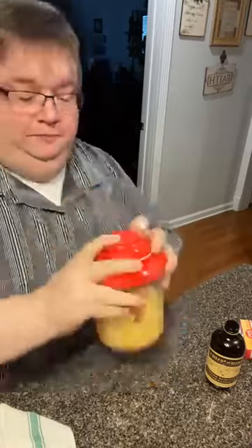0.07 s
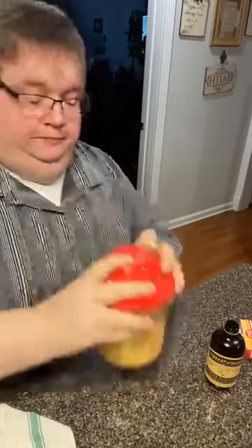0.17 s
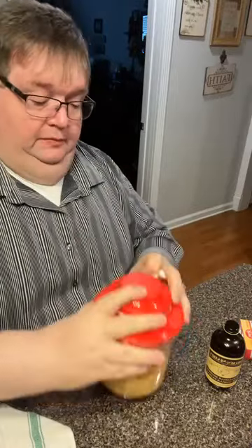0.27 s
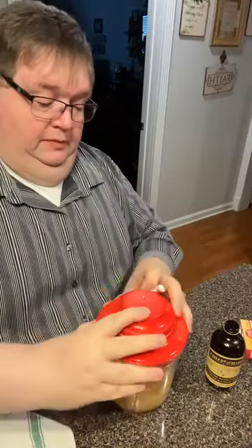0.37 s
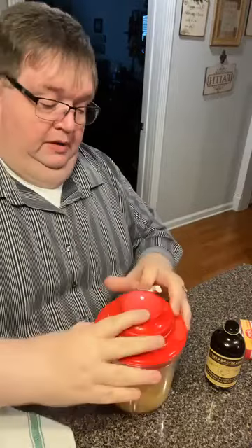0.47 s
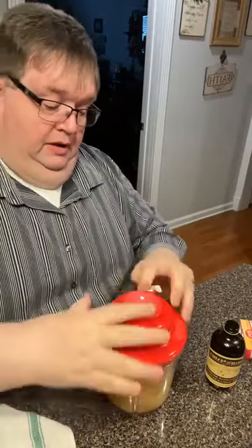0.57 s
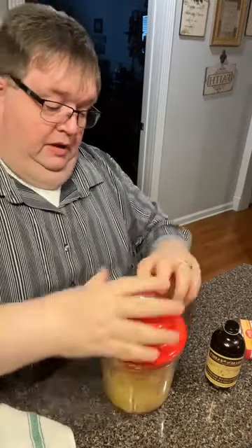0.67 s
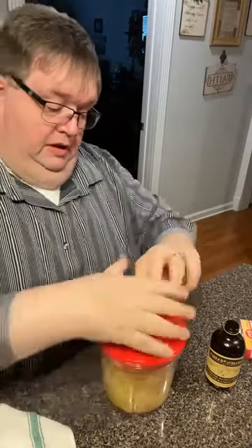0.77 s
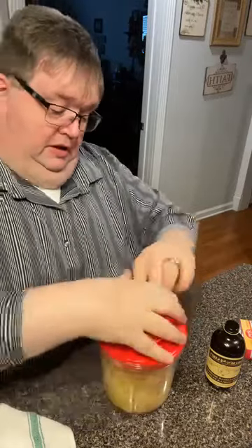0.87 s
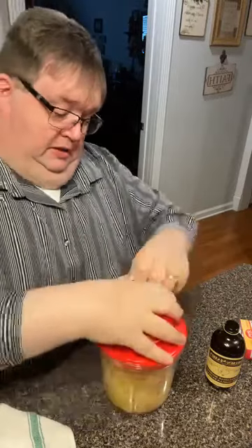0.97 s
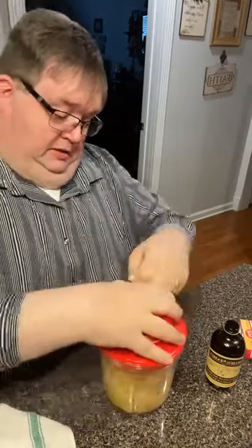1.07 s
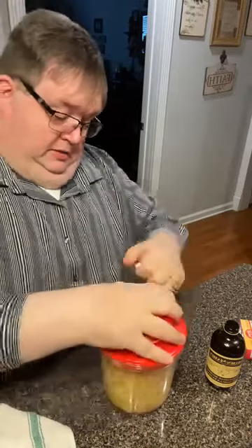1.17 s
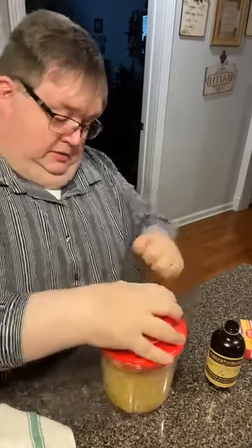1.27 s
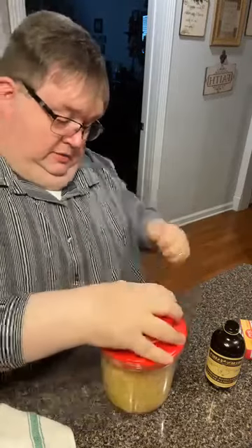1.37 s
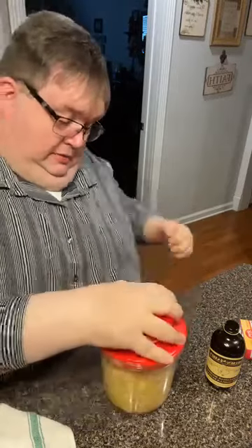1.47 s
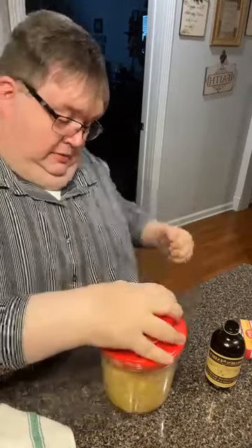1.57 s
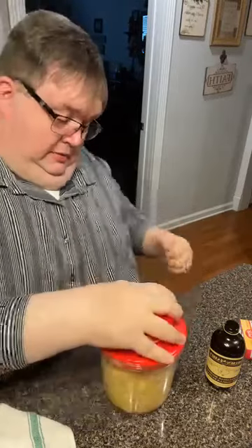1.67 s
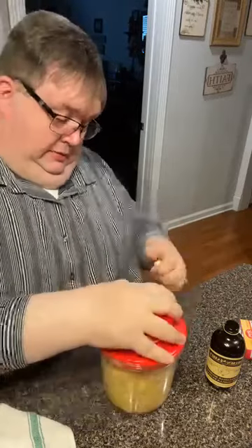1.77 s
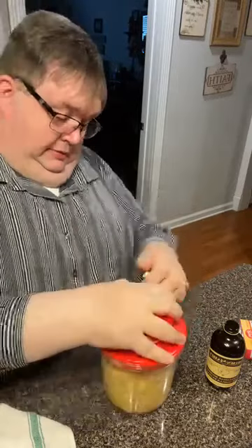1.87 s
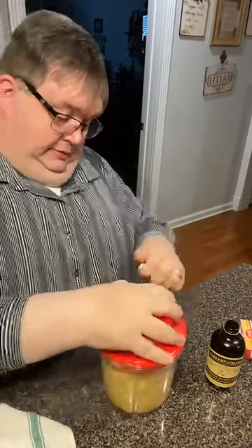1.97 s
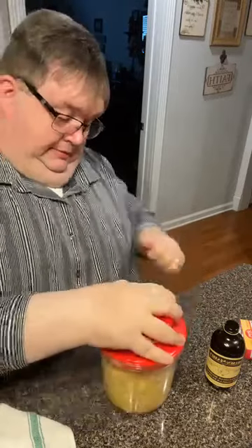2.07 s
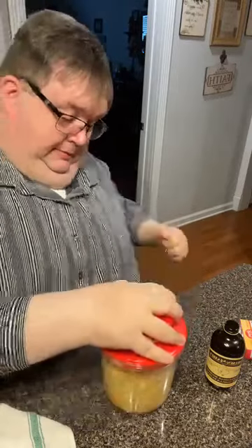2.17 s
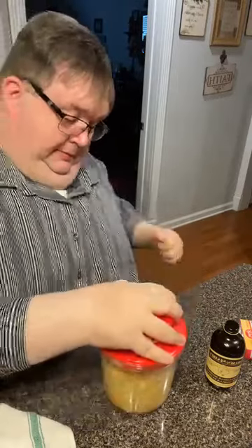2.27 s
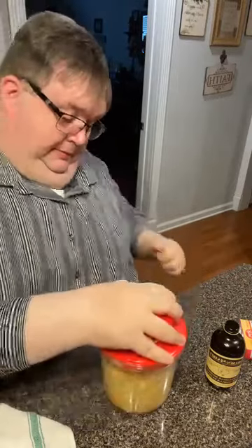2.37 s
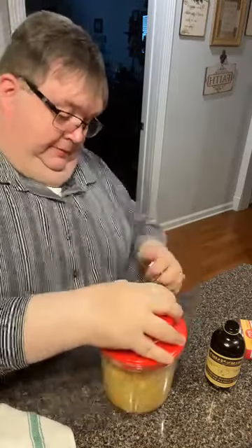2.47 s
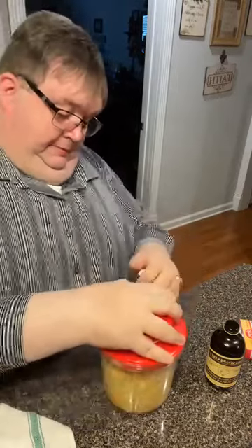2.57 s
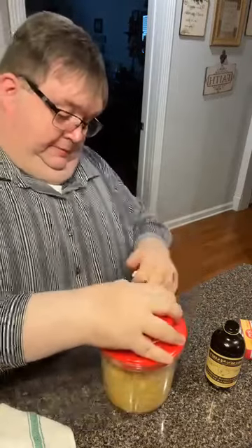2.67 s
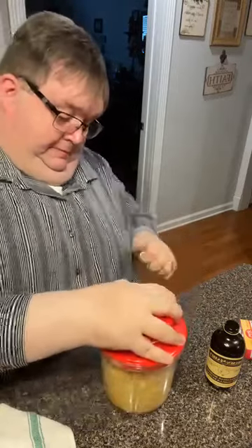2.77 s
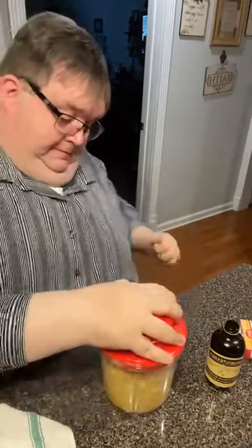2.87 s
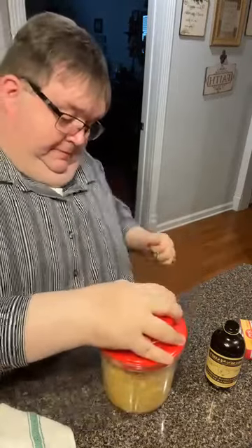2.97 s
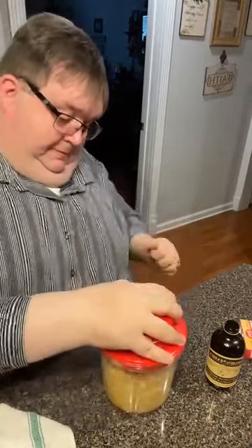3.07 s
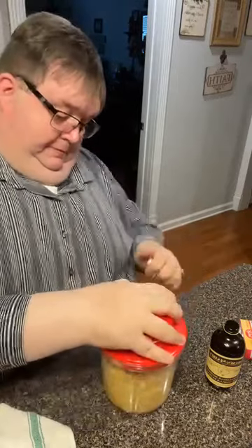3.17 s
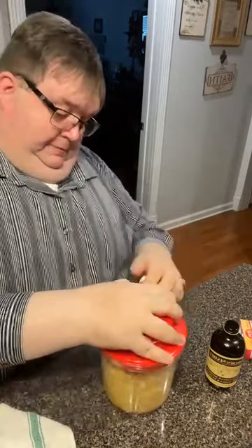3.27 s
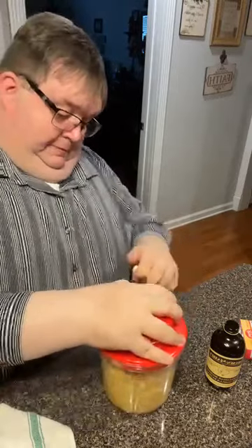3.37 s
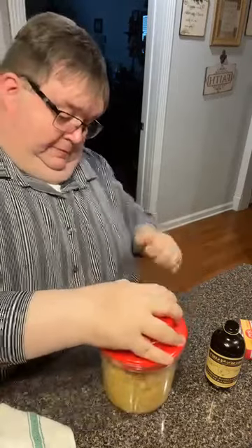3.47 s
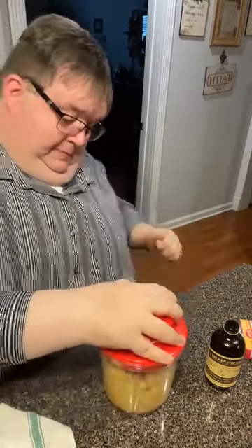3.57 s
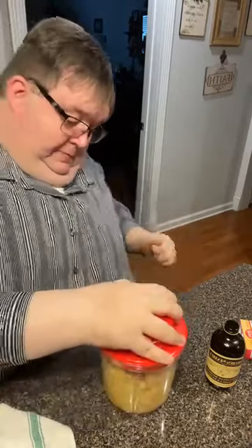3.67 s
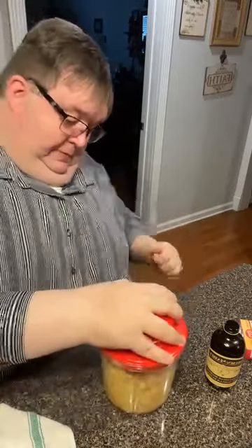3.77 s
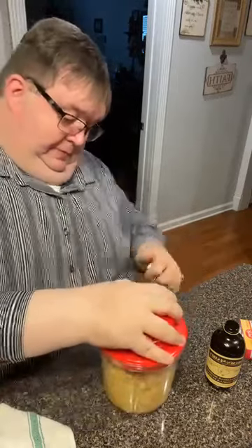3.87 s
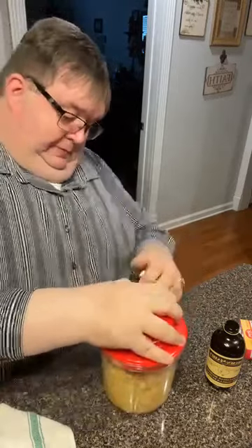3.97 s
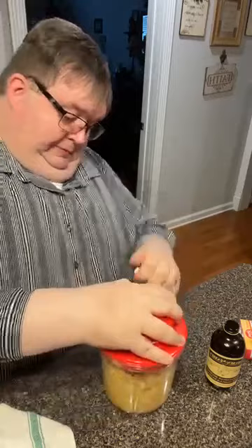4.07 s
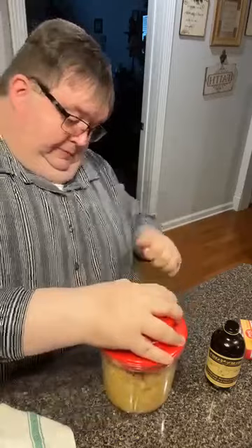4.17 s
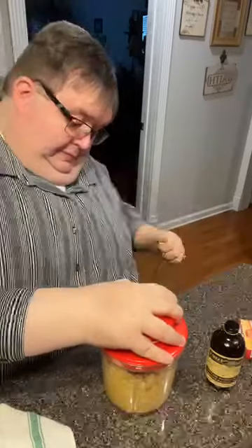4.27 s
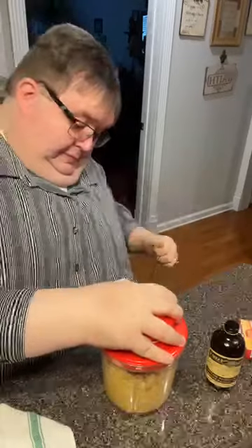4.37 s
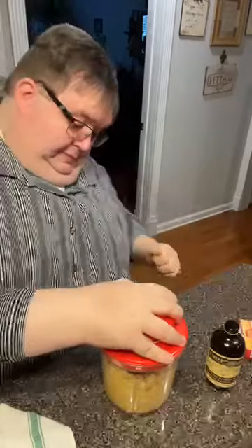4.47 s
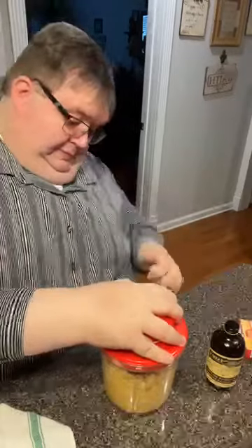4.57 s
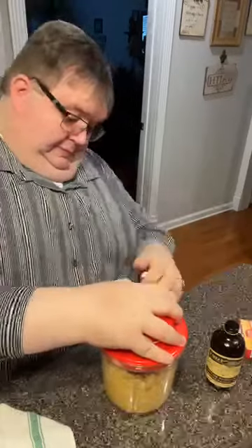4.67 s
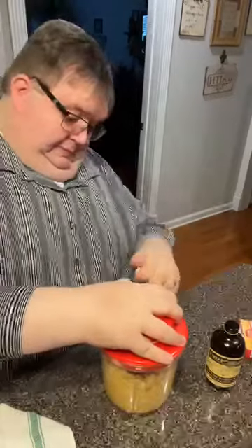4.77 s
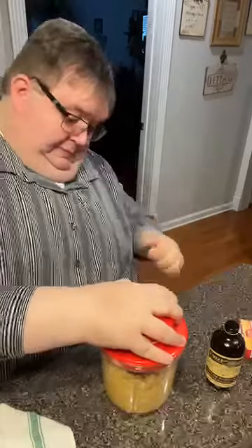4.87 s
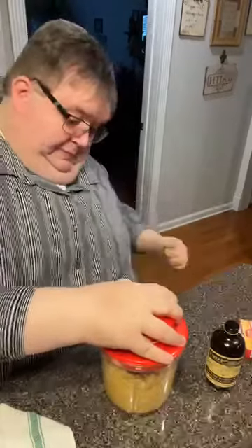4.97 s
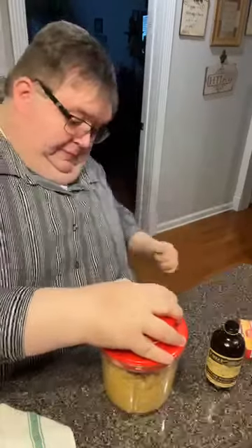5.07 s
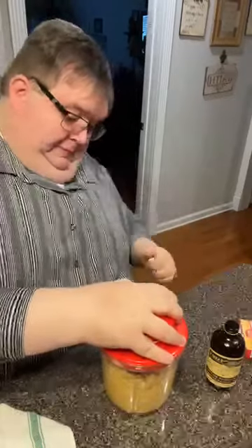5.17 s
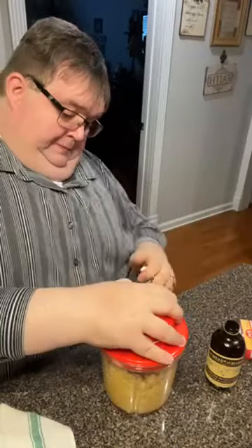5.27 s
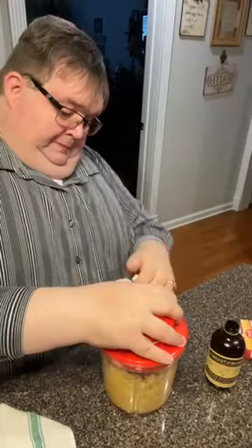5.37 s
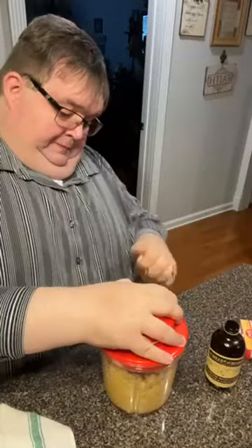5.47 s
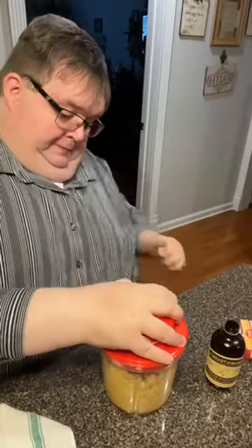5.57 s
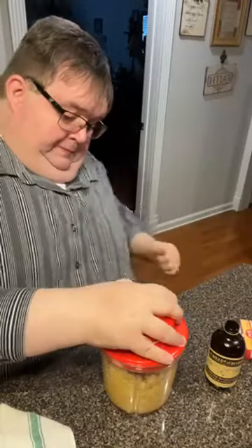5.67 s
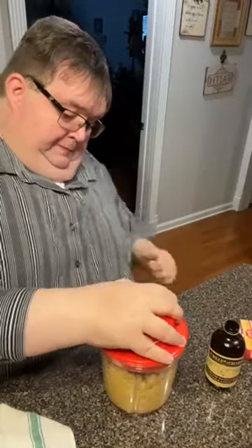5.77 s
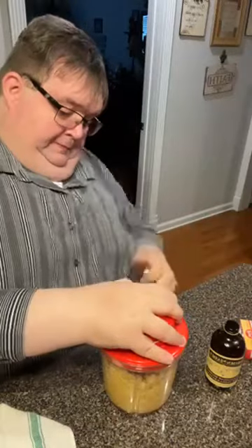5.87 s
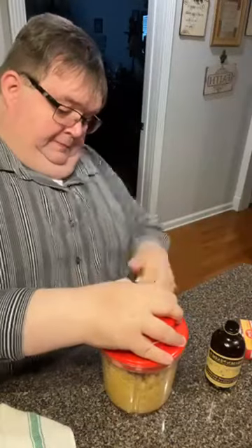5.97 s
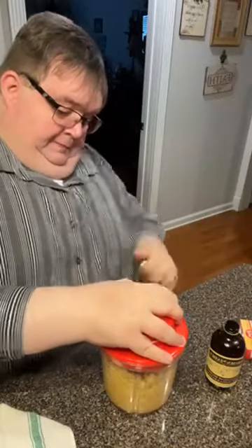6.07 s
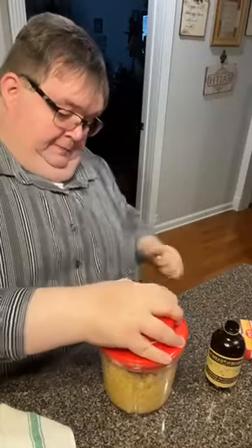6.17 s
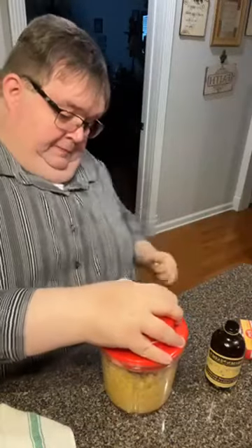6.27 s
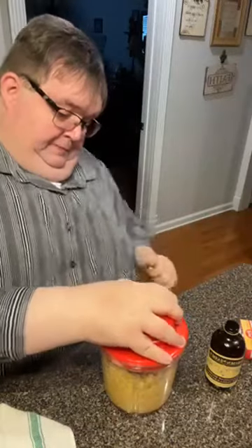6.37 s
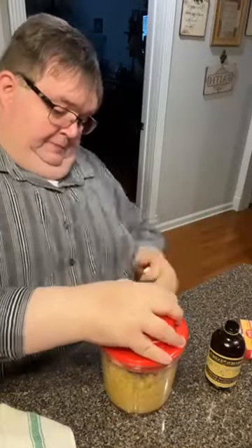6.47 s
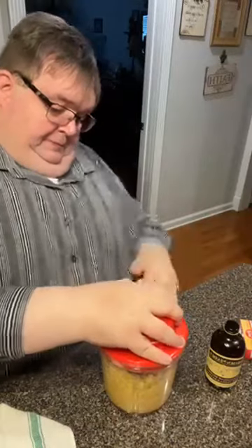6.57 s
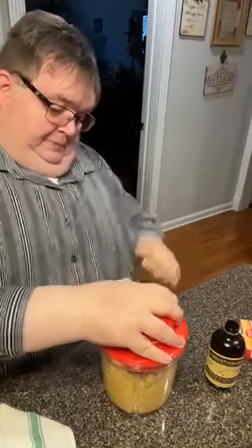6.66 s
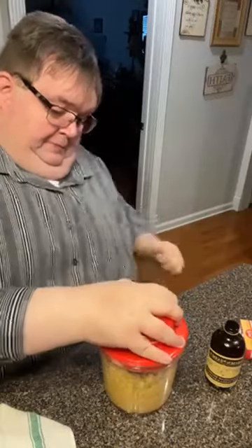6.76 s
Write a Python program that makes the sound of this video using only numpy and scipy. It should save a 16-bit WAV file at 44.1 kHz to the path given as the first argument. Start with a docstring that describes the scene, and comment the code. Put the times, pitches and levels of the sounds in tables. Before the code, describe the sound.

Repeated pulls on a hand food chopper, each a plastic clack and short chopping whirr followed by a rasping rewind, after a thud.

```python
"""A pull-cord food chopper is worked nine times: its blades fling apple bits against the plastic jar,
which shakes under the uneven load. The clutch clacks as a pull begins; between pulls a spring winds
the rasping cord back and the freewheel rattles in the hollow lid. Before the first pull, fingers rub
and tap the jar and set it down on a stone counter with a ringing thud.
Around it is a kitchen with a short reverb, faint air and a deep rumble."""
import sys
import numpy as np
from scipy import signal
from scipy.fft import rfft, irfft
from scipy.io import wavfile
from scipy.ndimage import uniform_filter1d

SR = 44100
rng = np.random.default_rng(int(sys.argv[2]) if len(sys.argv) > 2 else 0)


def transcribe(signal):
    """Save signal, clipped to [-1, 1], as a 16-bit WAV file at the path in sys.argv[1]."""
    frames = np.atleast_2d(signal).T
    limited = np.clip(frames, -1, 1)
    pcm = np.round(limited * 32767).astype(np.int16)
    wavfile.write(sys.argv[1], SR, pcm)


N = 301644
TIME = np.arange(N) / SR
BINS = np.fft.rfftfreq(8192, 1 / SR)

# pulls of the cord: t/s, length/s, churn level/dB, shake level/dB, clutch level/dB, hollow ring/dB
PULLS = [(1.293, 0.34, -32.5, -29.5, -39, 5), (2.091, .23, -28, -26.5, -6.5, 4),
         (2.7884, 0.23, -28.5, -25, -5, -0.5), (3.4897, 0.23, -28, -26, -2.5, -10),
         (4.2012, 0.23, -28, -26, -0.5, -8.5), (4.8963, 0.22, -27, -27.5, -2, 0),
         (5.5512, 0.2, -26.5, -26, -4.5, -1), (6.1624, 0.17, -27.5, -33.5, -1.5, 0),
         (6.7526, 0.21, -26, -29, -4.5, -1.5)]
# spectrum of a pawl hitting a ratchet tooth: f/Hz, level/dB
PAWL_SPECTRUM = [(60, -31), (260, -7), (700, -8.5), (1200, -4), (1750, -7), (2300, -4.5), (3100, 0),
                 (3850, -2), (4400, -20), (5500, -19), (9500, -27), (11500, -44), (16000, -41)]
# spectrum of the shaking jar: f/Hz, level/dB
SHAKE_SPECTRUM = [(30, -4), (55, -2), (70, -8), (84, 0.5), (108, 2), (125, -16), (200, -28.5), (500, -53)]


def amp(db):
    """Decibels to gain."""
    return 10 ** (np.asarray(db) / 20)


def unit(x):
    """Scales to rms 1."""
    return x / np.sqrt(np.mean(x ** 2) + 1e-20)


def curve(points, hz=BINS):
    """Joins breakpoints by straight lines on a log-frequency axis."""
    f, value = np.transpose(points)
    return np.interp(np.log(hz + 1), np.log(f + 1), value)


def add(mix, s, sound):
    """Mixes a sound in at time s."""
    part = mix[max(round(s * SR), 0):][:len(sound)]
    part += sound[:len(part)]


def impulse(db):
    """The minimum-phase ring, of energy 1, that has this spectrum."""
    log_gain = np.log(amp(np.concatenate([db, db[-2:0:-1]])))
    spectrum = np.exp(np.conj(signal.hilbert(log_gain)))
    ring = np.fft.ifft(spectrum).real[:len(db)]
    return ring / np.linalg.norm(ring)


def through(x, ring):
    """Plays x through a ring."""
    return signal.oaconvolve(x, ring)[:N]


def noise(spectrum):
    """Steady coloured noise, rms near 1."""
    return through(rng.standard_normal(N), impulse(curve(spectrum)))


def drift(size):
    """A random wander of rms 1, smoothed over size samples."""
    return unit(uniform_filter1d(rng.standard_normal(N), size))


def grains(per_s, spread_db):
    """Random tiny impacts, a few of them large."""
    size = amp(spread_db * np.minimum(rng.exponential(1, N), 4))
    return unit(size * rng.choice([-1, 1], N) * (rng.random(N) < per_s / SR))


def steadied(x, size=2600):
    """Evens out the flow of energy over size samples."""
    return x / np.sqrt(abs(uniform_filter1d(x ** 2, size)) + 1e-2)


def scatter(contact_s=0.00059, shell_s=0.017, shell_db=-19, size=1024):
    """A blow chatters for a millisecond, then bending waves run round the plastic shell."""
    t = TIME[:size]
    envelope = t / contact_s * np.exp(1 - t / contact_s) + amp(shell_db) * np.exp(-t / shell_s)
    spectrum = rfft(envelope * rng.standard_normal(size), 2 * size)
    return irfft(spectrum / np.sqrt(abs(spectrum)))[:size]  # partly whitened


def lid_ring(force_db, vary_db=2, bands=26, size=2048):
    """One blow on the lid, of energy 1; its colour depends on the spot that is struck."""
    # resonances of the lid and its cavity: f/Hz, width/Hz, lift/dB
    resonances = [(1620, 207, 6.5), (1994, 162, 11), (3550, 140, 4.5), (3797, 860, 5), (5630, 1900, 5.5),
                  (7350, 58, 7.5), (8550, 280, 7), (9970, 1900, 3)]
    lift = sum(db / (1 + (2 * (BINS - hz) / width) ** 2) for hz, width, db in resonances)
    knots = np.linspace(0, np.sqrt(BINS[-1]), bands)
    spot = np.interp(np.sqrt(BINS), knots, rng.standard_normal(bands))
    ring = signal.fftconvolve(impulse(force_db + lift + vary_db * spot), scatter())[:size]
    return ring / np.linalg.norm(ring)


def shower(blows, spectrum, spots=12):
    """Spreads a train of blows over many spots of the plastic."""
    spot = rng.integers(0, spots, N)
    return unit(sum(through(blows * (spot == k), lid_ring(curve(spectrum))) for k in range(spots)))


def strike(force_db, peak_db):
    """One blow on the lid with a given peak level."""
    ring = lid_ring(force_db)
    return amp(peak_db) * ring / abs(ring).max()


def snap(peak_db, ring_db, edge_db):
    """Hard plastic snaps; some ring the cavity more, some have a sharper edge."""
    # spectrum of a hard plastic hit: f/Hz, level/dB
    snap_spectrum = [(100, -15), (400, 0), (1000, -5), (1500, 5), (1850, 3.5), (2450, 5.5), (2850, 2.5),
                     (3150, 9.5), (3800, 6.5), (4300, -11.5), (5700, -13), (9000, -16), (11500, -26.5),
                     (15500, -27.5)]
    tint = curve([(2200, ring_db), (3000, 0), (4000, 0), (5500, edge_db)])
    return strike(curve(snap_spectrum) + tint, peak_db)


def background(air_db=-55.5, rumble_db=-38, heave_db=-34.5, heave_s=0.49):
    """A deep rumble that swells with each pull of the arm, and the still air of the room."""
    # spectrum of the rumble: f/Hz, level/dB
    rumble_spectrum = [(5, 0.5), (10, 5.5), (22, -6.5), (38, -5), (47, -14), (60, -14.5), (72, -24),
                       (95, -15), (130, -28), (250, -92)]
    # spectrum of the room air: f/Hz, level/dB
    air_spectrum = [(88, -53), (150, -9.5), (182, -5), (209, -8), (1040, -22), (1660, -17.5), (2450, -21.5),
                    (3550, -21.5), (16000, -53)]
    swell = np.full(N, amp(rumble_db))
    heave = np.sin(np.pi * np.arange(0, heave_s, 1 / SR) / heave_s)
    hardest_db = np.max(PULLS, axis=0)[3]
    for s, _, _, shake_db, *_ in PULLS:
        add(swell, s, amp(heave_db + shake_db - hardest_db) * heave)
    return swell * unit(noise(rumble_spectrum)) + amp(air_db) * unit(noise(air_spectrum))


def kitchen(x, tail_db, build_s=0.0035):
    """The room adds a few near reflections, then a short diffuse tail."""
    # reverb time of the kitchen: f/Hz, t60/s
    decay_times = [(150, 0.44), (530, 0.37), (1400, 0.23), (3700, 0.42), (9700, 0.42), (16000, 0.53)]
    # reflections from counter, body and walls: delay/s, level/dB
    echoes = [(.0031, -49), (.0074, -22.5), (.0132, -38), (.0178, -50), (.0245, -22)]
    hz, t, bands = signal.stft(rng.standard_normal(SR // 2), SR, nperseg=256)
    decay = amp(-60 * t / curve(decay_times, hz)[:, None])
    tail = signal.istft(bands * decay * (1 - np.exp(-t / build_s)), SR)[1]
    room = amp(tail_db) * tail / np.linalg.norm(tail)
    for s, db in echoes:
        add(room, s, amp([db]))
    return x + through(x, room)


def rubbing(ends_db=-22):
    """Fingers slide on the plastic to find their grip; each slide swells and fades."""
    # finger slides: t/s, rise/s, fade/s, level/dB
    slides = [(0, 0.0067, 0.16, -38.5), (0.091, 0.024, 0.24, -34.5), (.82, 0.21, 0.058, -47),
              (1.22, 0.091, .08, -48)]
    # spectrum of skin rubbing on plastic: f/Hz, level/dB
    skin_spectrum = [(100, -13), (600, 3.5), (1500, -2), (2800, 5), (4000, -6.5), (5000, -15),
                     (9000, -17.5), (15000, -55)]
    gain = np.zeros(N)
    for s, rise_s, fade_s, db in slides:
        t = np.arange(0, rise_s + fade_s, 1 / SR)
        add(gain, s, amp(db + np.interp(t, [0, rise_s, rise_s + fade_s], [ends_db, 0, ends_db])))
    return gain * shower(grains(per_s=1800, spread_db=4.5), skin_spectrum, spots=4)


def tapping(trim_db=-1, tint_depth=0.62):
    """Fingers and loose parts tap the jar; some taps are dull, some sharp."""
    # light taps: t/s, level/dB, sharp edge/dB
    taps = [(0.0278, -22.5, -27), (0.0623, -20.5, -11), (0.1057, -12, 10), (0.1245, -11.5, 1),
            (0.2004, -25, -24), (0.5703, -21.5, -20.5), (0.5854, -24, -26), (1.0402, -24, -12),
            (1.0653, -28.5, -8)]
    # spectrum of the sharpest tap: f/Hz, level/dB
    tap_spectrum = [(100, -8), (600, -2.5), (1400, 2.5), (2700, -1.5), (3600, 6), (4500, -5.5), (9000, -13),
                    (15000, -40)]
    out = np.zeros(N)
    sharpest_db = np.max(taps, axis=0)[2]
    for s, db, edge_db in taps:
        tint = curve([(2100, 0), (3200, edge_db - sharpest_db)])
        add(out, s, strike(curve(tap_spectrum) + tint_depth * tint, db + trim_db))
    return out


def landing(at_s=.4905, ring_db=-4, push_db=-4, push_s=0.00118,
            crunch_db=-13, crunch_s=0.013, slop_db=-18, slop_s=0.056):
    """The base pushes on the stone, the filled jar rings, and lid, blades and apple jolt inside it."""
    # modes of the filled jar on its base: f/Hz, level/dB, t60/s
    jar_modes = [(56.3, -15, 0.68), (110.7, -13, 0.42), (258, -8.5, 0.091), (397, -23, 0.073),
                 (452, -20, 0.12), (585, -10.5, 0.055), (746, -21, 0.12), (780, -22, 0.051),
                 (876, -14, 0.072), (1930, -18, .05)]
    # spectrum of the jolting contents: f/Hz, level/dB
    jolt_spectrum = [(40, -21), (110, 5), (240, 0), (350, -10.5), (850, -3), (1150, -11.5), (2000, -13),
                     (3500, -19.5), (7000, -28.5), (15000, -51)]
    out, t = np.zeros(N), TIME[:SR]
    ring = sum(amp(db - 60 * t / t60) * np.sin(2 * np.pi * hz * t) for hz, db, t60 in jar_modes)
    contact = t / push_s
    push = np.sin(np.pi * contact / 1.3) * contact * np.exp(1 - contact)
    jolt = (np.exp(-t / crunch_s) + amp(slop_db) * np.exp(-t / slop_s)) * (1 - np.exp(-contact ** 2))
    crunch = jolt * unit(noise(jolt_spectrum))[:SR]
    add(out, at_s, amp(ring_db) * ring + amp(push_db) * push + amp(crunch_db) * crunch)
    return out


def rocking(at_s=5.131, db=-18.5, hz=96, rise_s=.017):
    """The jar rocks and thumps back on the counter, cushioned by the hand that holds it down."""
    out, t = np.zeros(N), TIME[:SR]
    envelope = t / rise_s * np.exp(1 - t / rise_s)
    add(out, at_s, amp(db) * envelope * np.sin(2 * np.pi * hz * t))
    return out


def clacking(trim_db=-1):
    """Cord, reel and blades snap against the plastic."""
    # single snaps: t/s, level/dB, hollow ring/dB, sharp edge/dB
    clacks = [(1.404, -14, 1, 7.5), (1.552, -8.5, 4, 12), (1.5883, -12, -5, 15), (1.7365, -21.5, 1, -8),
              (2.0184, -13.5, -0.5, 0), (2.4558, -9, 0, 7.5), (2.558, -7, -9.5, -1), (2.763, -31, 1, 9),
              (3.1374, -12.5, -9, -13), (3.1619, -9, -2, 0), (3.275, -7.5, -4, -5), (3.5777, -6, -2, 7.5),
              (3.84, -14.5, -1.5, -2), (3.8639, -6.5, -3, 2), (3.973, -8, -2, 3), (4.0523, -11, -9, -6),
              (4.1231, -13.5, -4, 4), (4.826, -12.5, 0, -5), (5.1427, -7.5, -1, 0.5), (5.227, -11.5, -7, 2),
              (5.843, -8.5, 1, -12), (5.8631, -7, 5, 1), (6.2352, -11.5, 0, 14), (6.4813, -0.5, -8, 4)]
    out = np.zeros(N)
    for s, db, ring_db, edge_db in clacks:
        add(out, s, snap(db + trim_db, ring_db, edge_db))
    return out


def reel_gains(start_db=-6, end_db=-17, slowing=1.4, grab_s=.006, rasp_growth=1.205):
    """Gains of ratchet and rasp: the spring speeds the reel up; it slows as the handle comes home."""
    # rewinds of the cord: t/s, length/s, time to top speed/s, ratchet level/dB, rasp level/dB
    rewinds = [(1.736, .35, .13, -26, -27), (2.428, 0.37, .13, -25.5, -28), (3.136, 0.35, .15, -28, -26),
               (3.837, 0.35, 0.14, -26.5, -28), (4.542, 0.37, .15, -27, -27.5),
               (5.228, .31, .09, -24, -26.5), (5.843, .305, 0.12, -25, -26.5),
               (6.462, .28, .1, -24.5, -25.5)]
    ratchet, rasp = np.zeros((2, N))
    for s, length, top_s, ratchet_db, rasp_db in rewinds:
        t = np.arange(0, length, 1 / SR)
        early = np.maximum(1 - t / top_s, 0)
        late = np.maximum((t - top_s) / (length - top_s), 0)
        speed = np.minimum(t / grab_s, 1) * amp(start_db * early + end_db * late ** slowing)
        add(ratchet, s, amp(ratchet_db) * speed)
        add(rasp, s, amp(rasp_db) * speed ** rasp_growth)  # swells and dies faster than the ticks
    return ratchet, rasp


def rewinding(teeth_hz=170, jitter=.35, spread_db=5, snag_db=2, shake_db=-13):
    """Pawls skip unevenly over the ratchet at the reel's pace; the cord rasps and snags in its guide."""
    # spectrum of the sliding cord: f/Hz, level/dB
    cord_spectrum = [(60, -29), (240, 4), (800, 1), (1200, 2.5), (2000, -2), (3800, -8.5), (4500, -12),
                     (5700, -14), (9700, -21), (11000, -27), (16000, -35)]
    ratchet_gain, rasp_gain = reel_gains()
    wobble = np.exp(jitter * drift(200))
    pace = (.05 + ratchet_gain / ratchet_gain.max()) ** .45
    teeth_passed = np.floor(np.cumsum(teeth_hz * wobble * pace) / SR)
    ticks = np.diff(teeth_passed, prepend=0) * amp(spread_db * np.clip(rng.standard_normal(N), -2, 2))
    rattle = shower(steadied(unit(ticks)), PAWL_SPECTRUM)
    snags = amp(snag_db * drift(900))
    rasp = shower(snags * grains(per_s=4000, spread_db=4), cord_spectrum)
    return ratchet_gain * (rattle + amp(shake_db) * noise(SHAKE_SPECTRUM)) + rasp_gain * rasp


def clutch(catch_db=1, edge_db=2, skim_db=-13, skim_leads_s=(0.0054, 0.0038)):
    """As a pull begins, the pawl skims two teeth before it catches the third."""
    out = np.zeros(N)
    for s, *_, db, ring_db in PULLS:
        for lead_s in skim_leads_s:
            add(out, s - lead_s * rng.uniform(0.87, 1.1), strike(curve(PAWL_SPECTRUM), db + skim_db))
        add(out, s, snap(db + catch_db, ring_db, edge_db))
    return out


def shaking(rise_s=0.14, rise_db=22, settle_db_per_s=24.5, fall_db_per_s=157):
    """The uneven load shakes the jar, most as it starts to turn, less as the apple spreads out."""
    gain, t = np.zeros(N), TIME[:SR]
    for s, length, _, db, *_ in PULLS:
        attack = rise_db * np.maximum(1 - t / rise_s, 0) ** 2
        release = fall_db_per_s * np.maximum(t - length, 0)
        add(gain, s, amp(db - attack - settle_db_per_s * t - release))
    return gain * steadied(unit(noise(SHAKE_SPECTRUM)))


def blade_gain(spin_up_s=.15, spin_up_db=19.5, coast_db_per_s=265.5):
    """Gain of the churning: each pull spins the blades up and holds, then the apple brakes them."""
    gain, t = np.zeros(N), TIME[:SR]
    for s, length, db, *_ in PULLS:
        attack = spin_up_db * np.maximum(1 - t / spin_up_s, 0) ** 2
        release = coast_db_per_s * np.maximum(t - length, 0)
        add(gain, s, amp(db - attack - release))
    return gain


def chopping(top_sweep_hz=95, surge=0.27, trim_db=3):
    """Apple bits pelt the jar in surges as the blades sweep by."""
    # spectrum of apple hitting plastic: f/Hz, level/dB
    apple_spectrum = [(60, -33), (170, 0), (240, 3.5), (470, 6), (760, 3.5), (1300, -0.5), (1700, -3.5),
                      (2250, -1.5), (2700, -4.5), (3800, -13.5), (4500, -19), (9000, -25.5), (11500, -40.5),
                      (16000, -50)]
    gain = blade_gain()
    sweeps = np.cumsum(top_sweep_hz * (gain / gain.max()) ** .3) / SR
    bits = grains(per_s=3500, spread_db=2) * (1 + surge * np.cos(2 * np.pi * sweeps))
    return amp(trim_db) * gain * shower(steadied(bits), apple_spectrum)


def scene():
    """The chopper in the kitchen; the snaps come from the lid, nearest the listener, and sound drier."""
    body = landing() + rubbing() + tapping() + chopping() + shaking() + rewinding() + rocking()
    mix = kitchen(body, tail_db=-12) + kitchen(clutch() + clacking(), tail_db=-16)
    return (mix + background())[None]


def record(dry):
    """Clips peaks at full scale, then cuts the top of the treble."""
    lowpass = signal.firwin(511, 15850, window=("kaiser", 9), fs=SR)
    return signal.oaconvolve(np.clip(dry, -1, 1), lowpass[None], "same")


dry = scene()
out = record(dry)
transcribe(out)
```